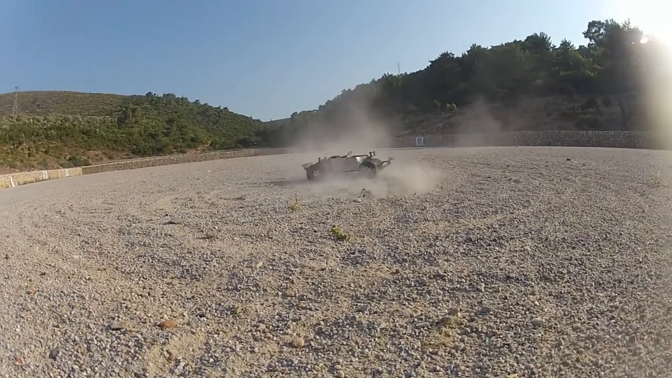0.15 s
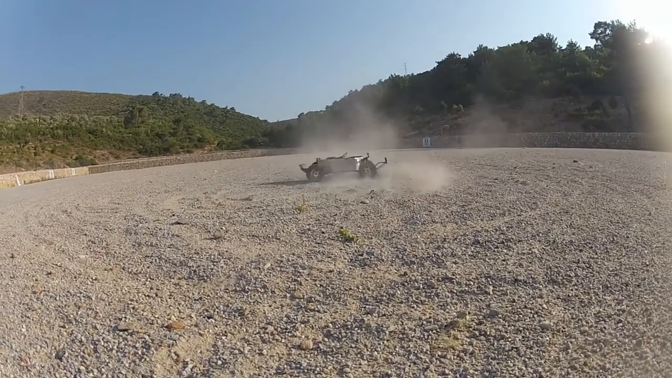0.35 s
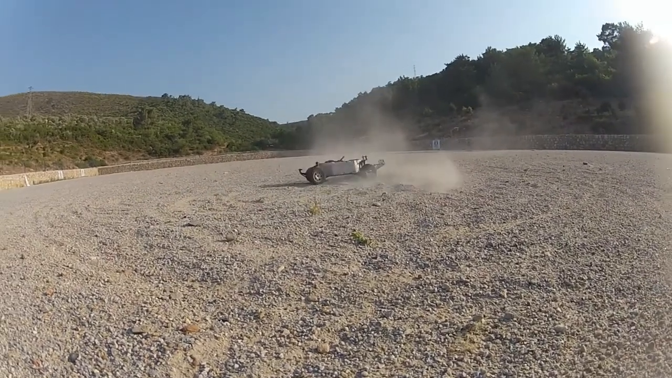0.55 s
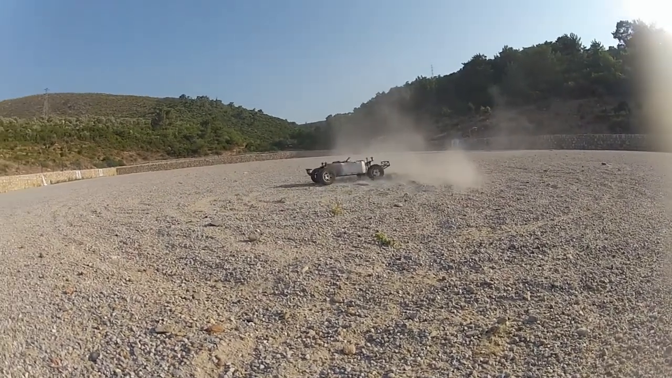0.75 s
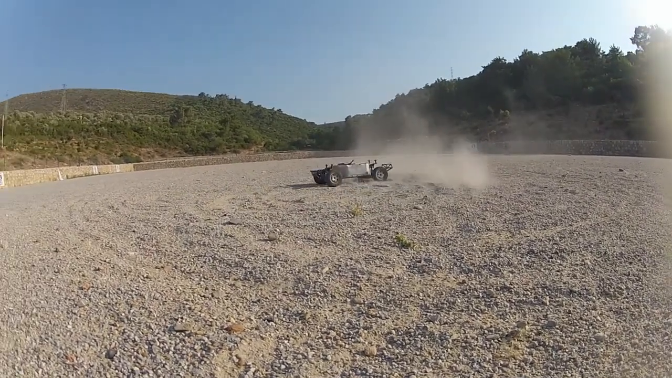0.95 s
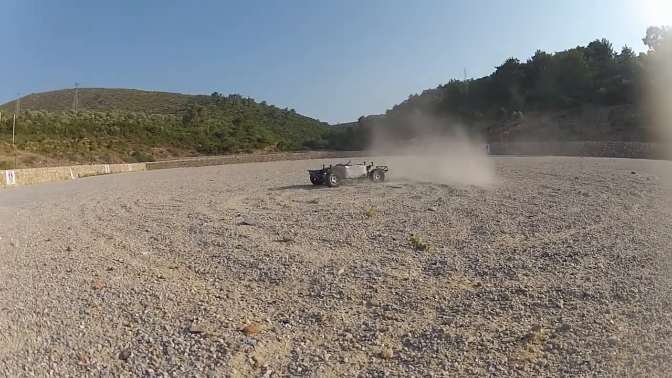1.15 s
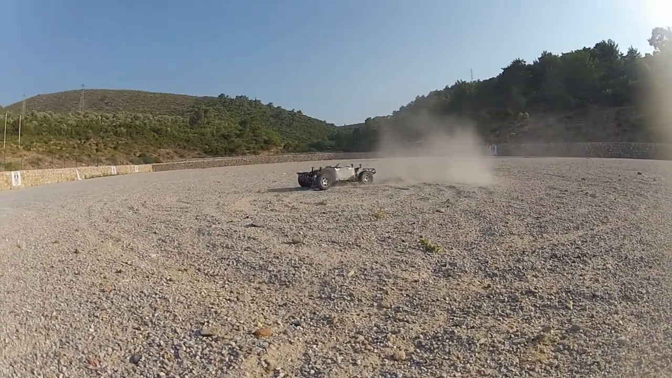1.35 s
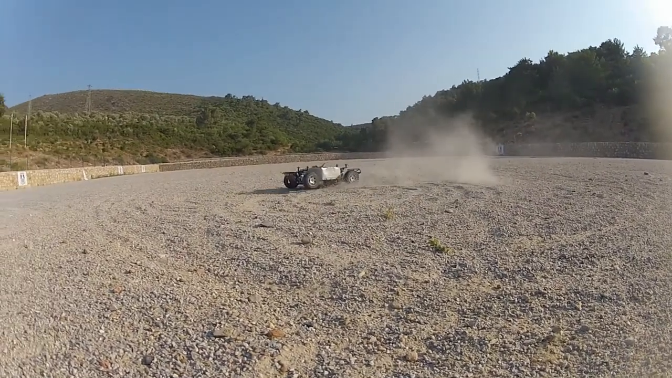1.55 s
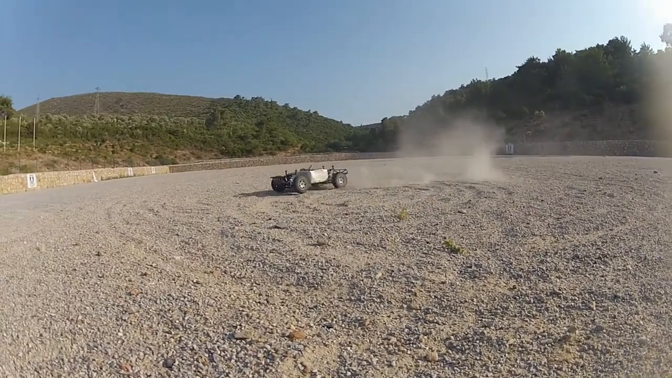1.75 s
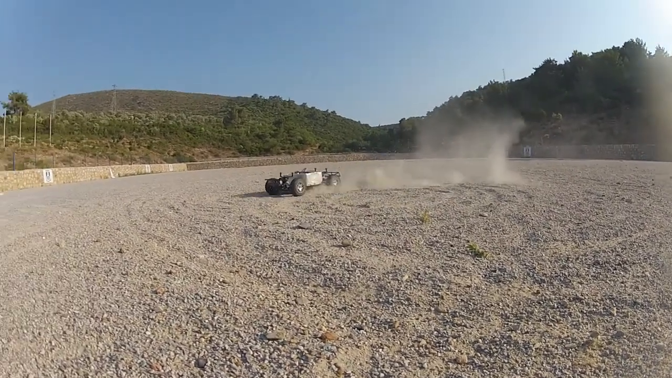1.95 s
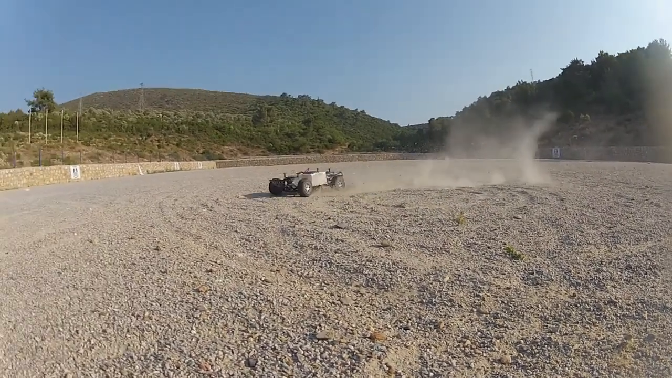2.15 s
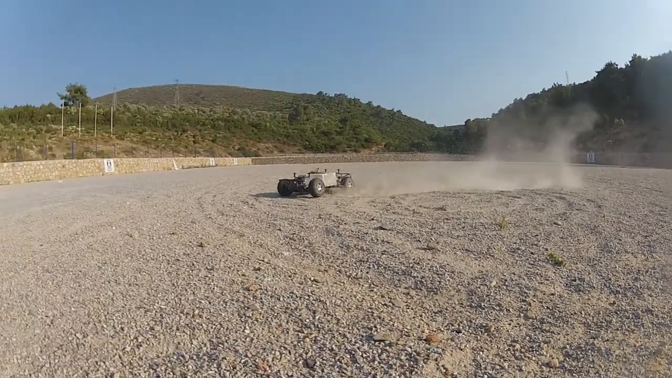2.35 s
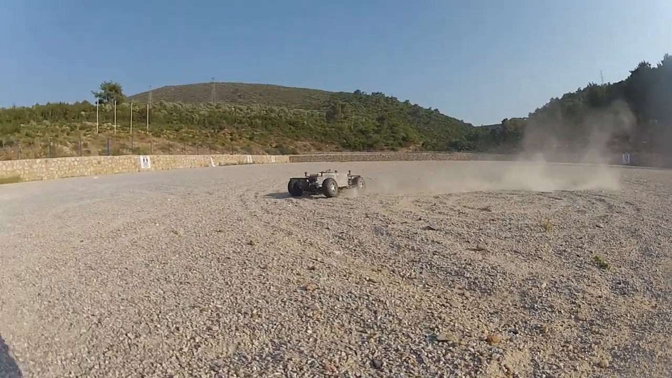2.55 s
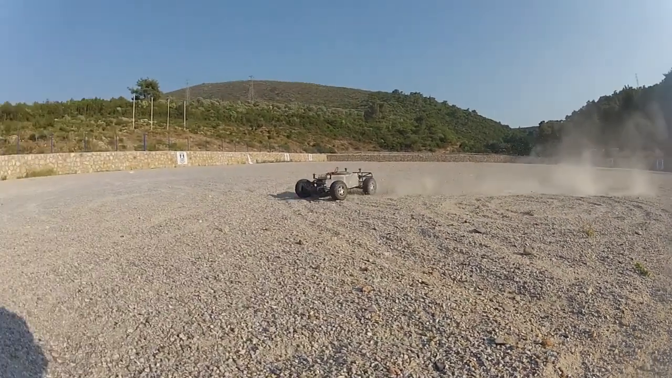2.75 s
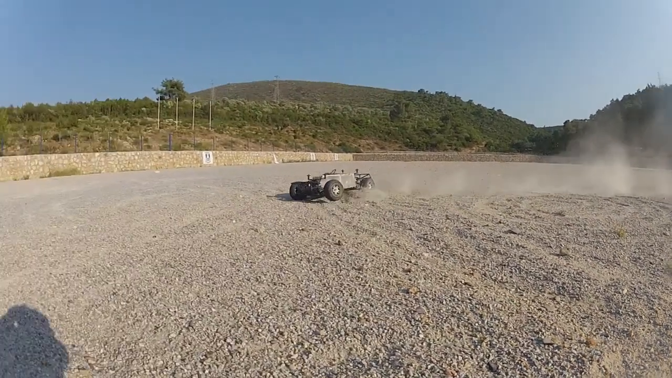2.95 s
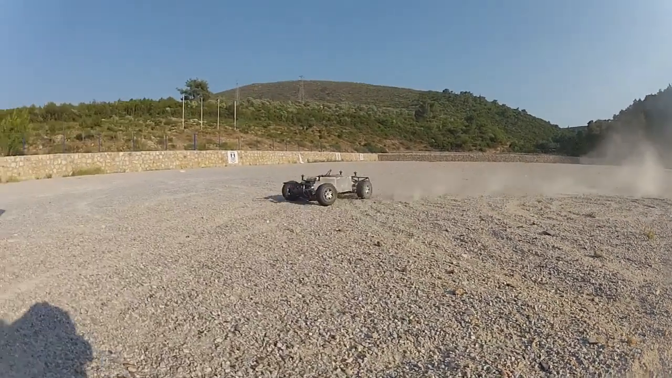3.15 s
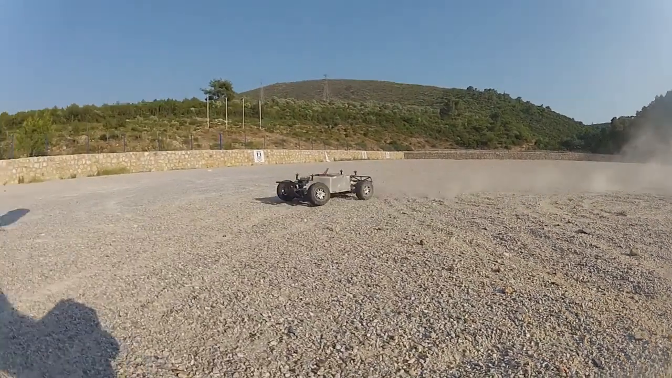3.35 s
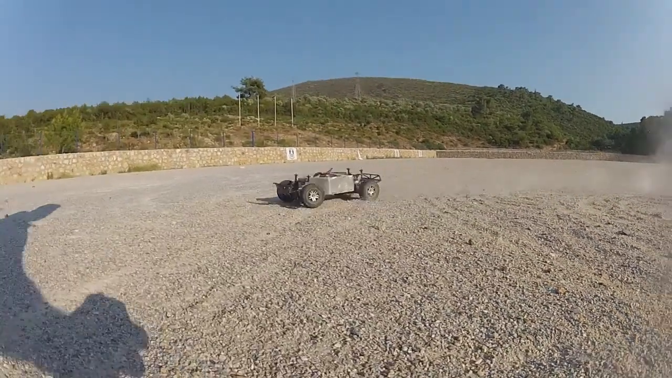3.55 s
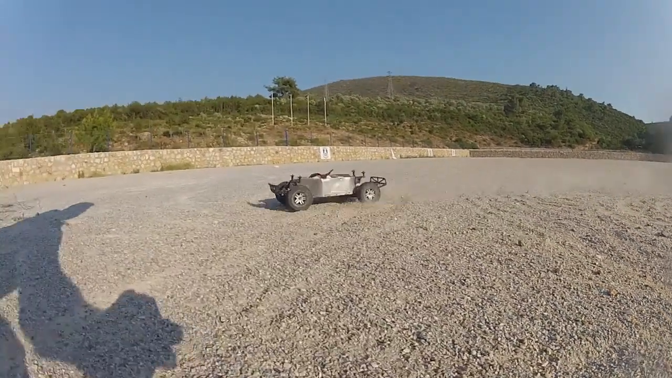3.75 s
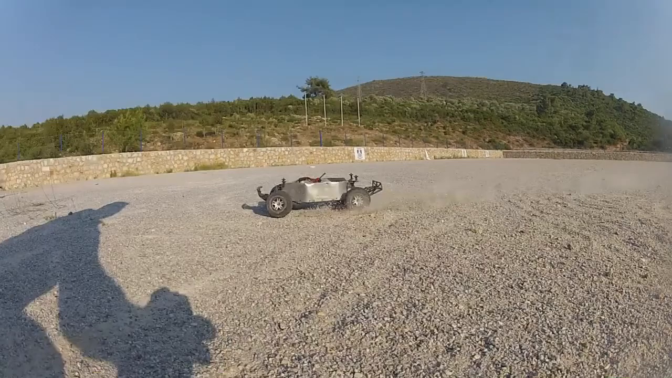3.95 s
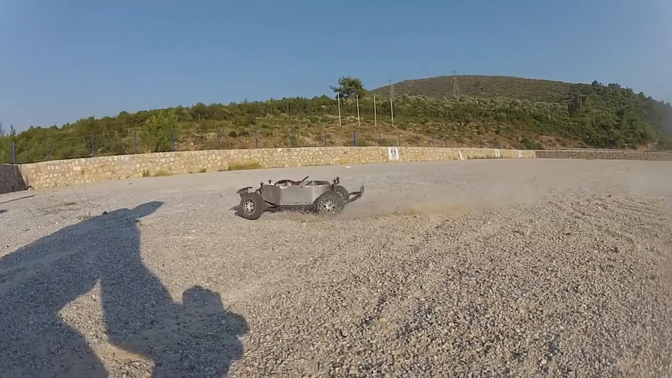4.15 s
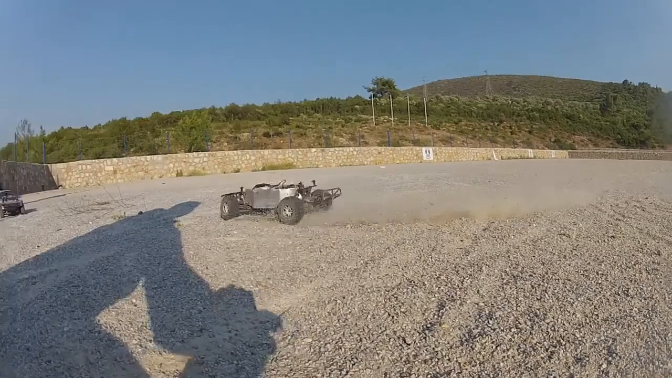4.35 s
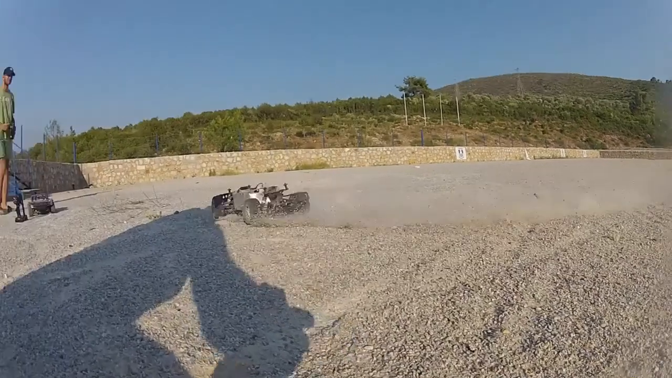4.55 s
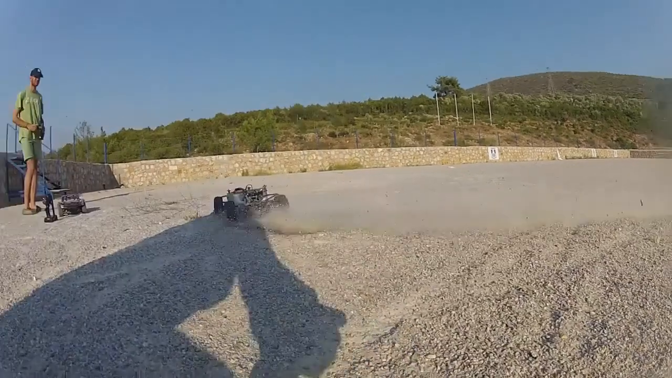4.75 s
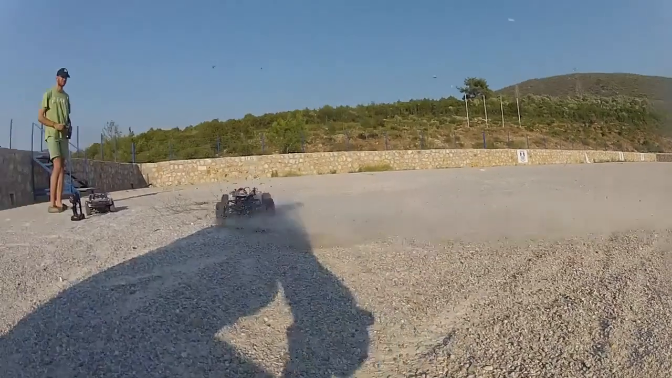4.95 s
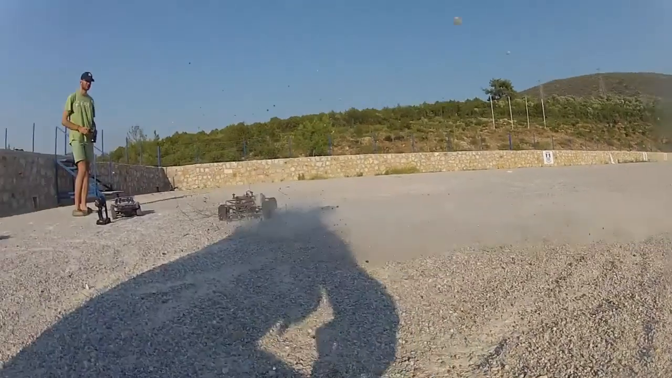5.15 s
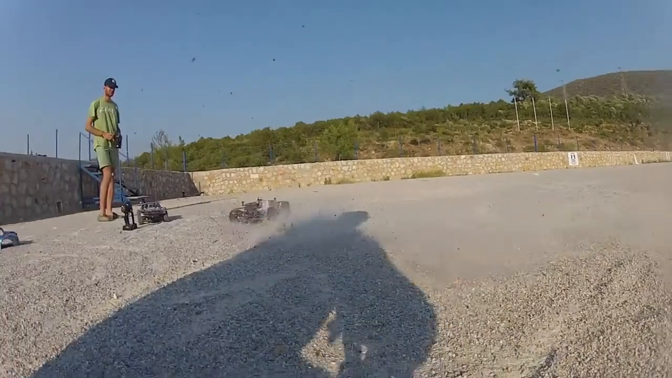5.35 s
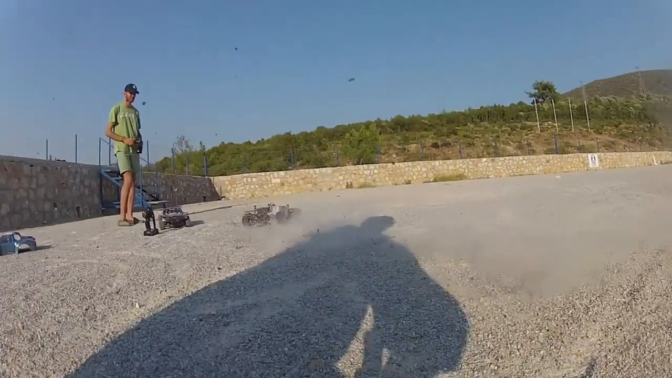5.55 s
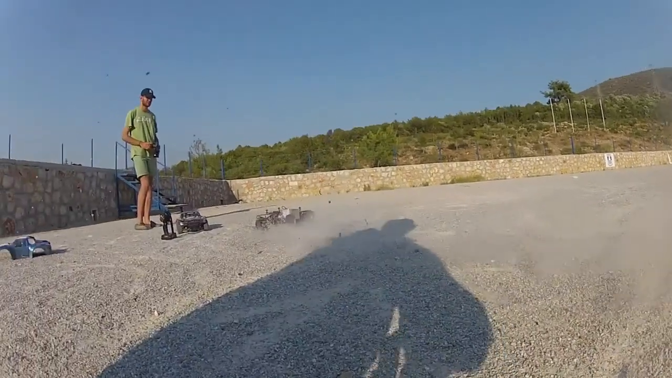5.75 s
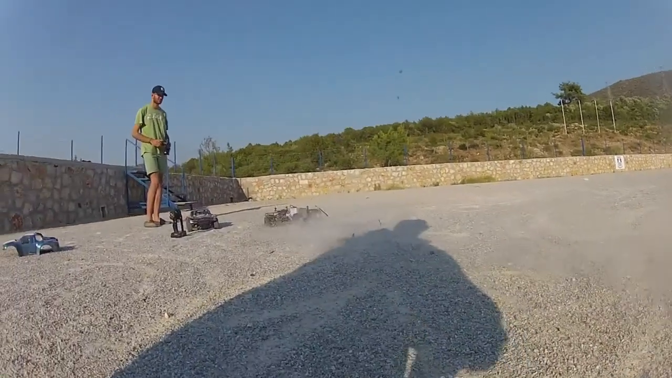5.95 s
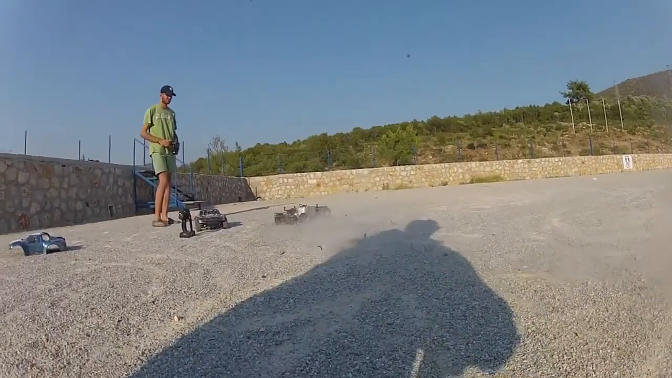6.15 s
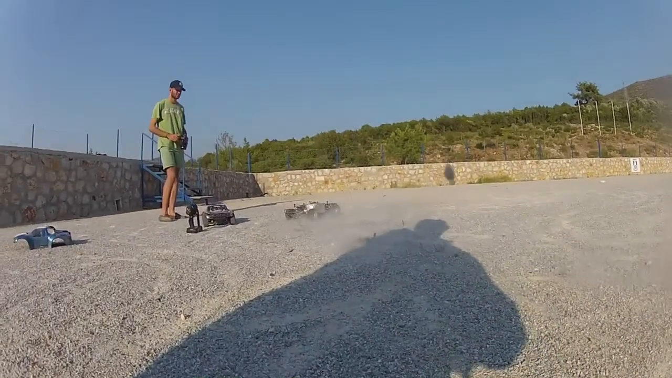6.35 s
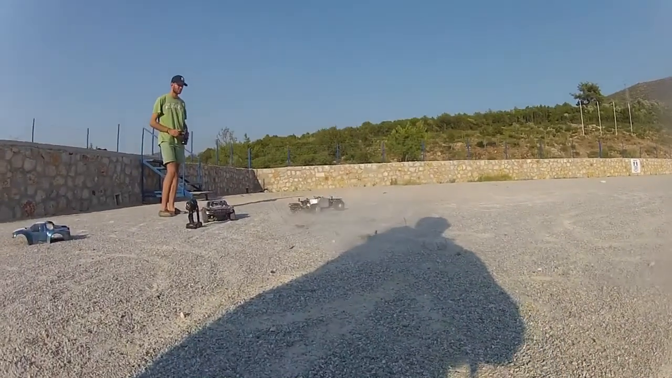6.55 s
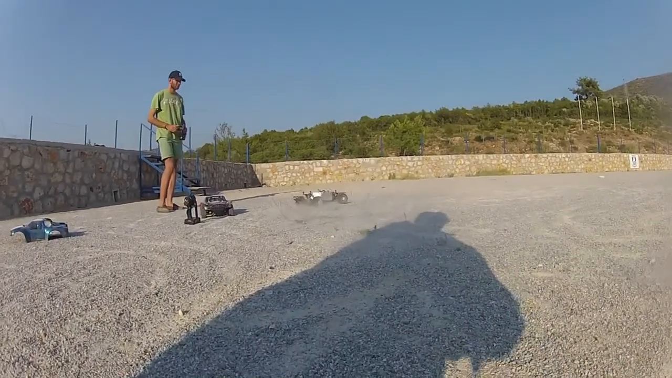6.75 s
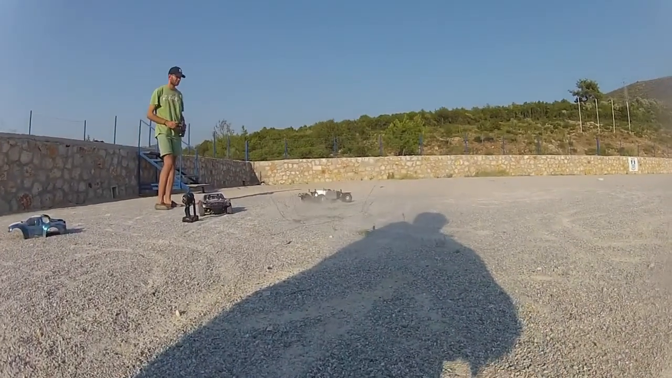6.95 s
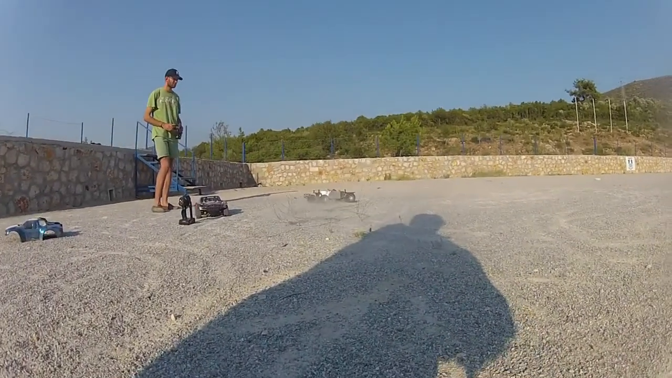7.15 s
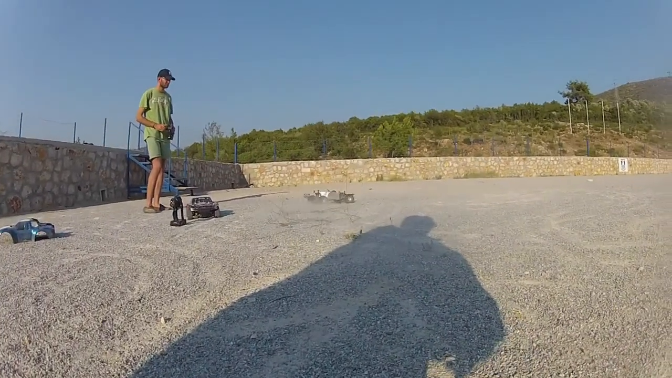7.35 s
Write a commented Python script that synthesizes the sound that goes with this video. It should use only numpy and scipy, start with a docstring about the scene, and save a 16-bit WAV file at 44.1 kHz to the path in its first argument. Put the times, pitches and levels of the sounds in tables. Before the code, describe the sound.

Slow-motion radio-controlled truck crunches over gravel, motor whining in stuttering glides, then a stone knocks the camera case hard, followed by small ticks.

```python
"""Gravel lot: a radio-controlled truck slides and revs; stones tick on a camera's sealed case, one knocks it hard.
Tyre hiss is shaped noise with grains, the motor is gliding tones, rough tones hold; all pass the case's modes.
Each stone is a blow and a skid of tiny contacts that set off the modes; wind rumbles and a gear rattles.
Coarse sampling adds mirror bands; slow-motion playback replays overlapping slices, so sounds stutter three times."""
import sys
import numpy as np
from scipy import signal
from scipy.fft import rfft, irfft
from scipy.io import wavfile
from scipy.ndimage import uniform_filter1d

SR = 44100
rng = np.random.default_rng(int(sys.argv[2]) if len(sys.argv) > 2 else 0)


def file_out(sig):
    """Save sig as 16-bit WAV at sys.argv[1]."""
    # one column per channel
    cols = np.atleast_2d(sig).T
    # limit, then scale
    lim = np.clip(cols, -1, 1)
    pcm = np.round(lim * 32767).astype(np.int16)
    wavfile.write(sys.argv[1], SR, pcm)


def ratio(d):
    """dB to gain"""
    e = np.asarray(d, float) / 20
    return 10 ** e


N = 324135
REAL_SAMPLES = N // 3 + SR // 8  # real time that the slow motion stretches

# slow motion: first seam, slice length, cross-fade
FIRST_SAMPLES, SLICE_SAMPLES, FADE_SAMPLES = 2300, 3150, 530
# seam offsets creep from 5 to -3 ms, each up to 7 ms off
SEAMS_MS = np.linspace(5, -3, N // SLICE_SAMPLES + 2) + rng.uniform(-7, 7, N // SLICE_SAMPLES + 2)
# seams while the stones fly, one a slice from STONE_SLICE on: (offset [ms])
STONE_SLICE = 67
STONE_SEAMS_MS = [-5.3, -6.2, -0.82, -5.35, -6.92, -2.09, -2.68, 1.51, -7.65, -7.74, 5.89, 2.35, -5.34,
                  4.05, -2.82, -3.59, -6.27, -7.5, -0.45, -8.32, -2.58, -2.63, 3.83, 4.62, -3.59]

# steady hiss, opposite in the channels: (frequency [Hz], relative density [dB per Hz])
SIDE_HISS_COLOUR = [(24, -29.5), (40, 1), (659, -8.5), (1080, -20), (2110, -15), (3830, -11), (5990, -19),
                    (6950, -14.5), (15000, -35.5)]
SIDE_HISS_DB = -78.5
# side signal that follows the mid: (frequency [Hz], side over mid before soft limiting [dB])
SIDE_OVER_MID = [(60, -26.5), (200, -23), (700, -31.5), (2380, -36.5), (4400, -29), (15000, -31)]

# wind on the case: (played time [s], level before trim [dB])
WIND_LEVEL = [(0, -57), (1.68, -57.5), (1.92, -54.5), (2.6, -57.5), (2.99, -56), (3.25, -60), (4.09, -52.5),
              (4.65, -56), (4.93, -55), (5.24, -58), (6.04, -56.5), (7.35, -59.5)]
# wind spectrum: (frequency [Hz], relative density [dB per Hz])
WIND_COLOUR = [(10, 0.5), (25, 12), (90, -2), (250, -5.5), (400, -7.5), (600, -18), (1200, -24.5),
               (6000, -42.5)]

# gear rattle: (played time [s], level [dB])
RATTLE_LEVEL = [(1.9, -95), (2.1, -69), (2.4, -65), (2.9, -72), (3.0, -95)]
RATTLE_HZ, RATTLE_HALF_WIDTH_HZ, RATTLE_KNOCKS_PER_S = 3850, 220, 75

# tyres and gears: (played time [s], level before trim [dB], brightness [dB per octave])
TRUCK_LEVEL = [(0, -61, -3), (1.04, -61.5, -2.5), (1.21, -53.5, -1.5), (1.56, -52, 0), (1.98, -52, -2),
               (2.11, -54.5, -0.5), (2.99, -59, -2), (3.15, -63, -1), (3.4, -57, -3), (3.77, -51, 0.5),
               (4.13, -48, -2), (4.46, -56, -1), (5.12, -65.5, 0), (5.65, -67, 1.5), (5.92, -62.5, -1.5),
               (6.88, -61, -1.5), (7.35, -66, -2.5)]

# rough held tones: (real time [s], length [s], frequency [Hz], level before trim [dB])
HELD_TONES = [(0.034, .04, 3520, -62.5), (0.555, 0.13, 930, -65.5), (0.791, .085, 925, -62),
              (0.813, 0.15, 1647, -62), (1.26, .26, 2440, -69), (1.43, .12, 3630, -63.5)]
# throttle blips, one curve each: (real time [s], shaft order [Hz], level before trim [dB])
REVS = [
    [(0.396, 570, -48), (.42, 750, -56.5), (.44, 990, -52), (.465, 1150, -51), (.49, 1370, -52.5),
     (.528, 1690, -51), (.55, 1710, -62)],
    [(1.18, 630, -61), (1.225, 770, -49), (1.27, 960, -57.5), (1.3, 1250, -56), (1.343, 1630, -56),
     (1.39, 1530, -61)],
]
# thin high whine, one curve a stroke: (real time [s], frequency [Hz], level before trim [dB])
WHINES = [
    [(0, 1680, -67), (.065, 1727, -68), (.105, 1418, -58.5), (.19, 1767, -72), (.214, 1654, -57.5),
     (.238, 1300, -64), (.3, 1662, -63), (.38, 1712, -62.5), (.41, 2510, -49)],
    [(.975, 2040, -62), (.99, 2072, -54), (1.043, 2180, -57.5), (1.08, 1620, -68.5), (1.13, 1680, -59),
     (1.164, 1933, -48.5), (1.2, 2500, -60)],
    [(2.18, 2020, -69), (2.2, 2020, -60.5), (2.22, 2230, -56.5), (2.25, 2184, -57), (2.285, 2367, -60.5),
     (2.34, 2396, -64.5), (2.36, 2230, -55)],
]
ROUGHNESS_RMS, WOBBLE_RMS = .3, .012  # fractions of level and of pitch
REV_FLUTTER_DB, WHINE_FLUTTER_DB, HELD_FLUTTER_DB = 4, 7, 8
WHINE_WANDER_RMS, HELD_WANDER_RMS = .02, .035  # fractions of pitch
# second order over the first at 1 kHz shaft order; 20 dB weaker above the top
OVERTONE_DB, OVERTONE_DB_PER_OCTAVE, OVERTONE_TOP_HZ = -7.5, 12, 3000

# case modes: (frequency [Hz], level [dB], t60 [s], extra when struck [dB])
CASE_MODES = [(626, -6, .014, -3.5), (937, -3.5, 0.021, 3.5), (1251, -7.5, 0.024, -8), (1615, -6, 0.018, 4),
              (2082, -4, 0.01, -0.5), (2450, -5, 0.022, -6.5), (2785, -2.5, 0.0073, 3),
              (3604, -3.5, 0.0078, -2), (3800, -4, 0.011, -4), (4464, -5.5, 0.0063, -1),
              (4955, -12.5, 0.016, 4), (5570, -9.5, 0.009, 3.5)]
# stones: (played time of first hearing [s], peak [dB], blow centre [Hz], spread [octaves],
# skid decay [ms], lens-window weight [dB])
STONES = [(5.0489, -22, 1415, 0.49, 3.04, -1.5), (5.1128, -23, 1165, 0.97, 1.7, -17),
          (5.189, -4, 4300, 0.29, 0.36, -9.5), (5.1918, -2, 2554, 0.65, 1.1, 7),
          (5.3289, -24, 2366, 0.79, 2.4, -13), (5.473, -27, 1910, 0.66, 2.9, 13),
          (5.555, -34.5, 1920, 1.3, 1.1, -26.5), (5.605, -40, 2230, 1.1, 2.2, -7),
          (5.968, -34, 2725, 0.46, 3.5, 2), (6.182, -21, 2340, 0.51, 0.49, 0.5),
          (6.189, -31.5, 3103, 0.71, 3.3, -13), (6.197, -38.5, 2540, 0.82, 2, 1.5),
          (6.408, -42.5, 2190, 0.24, 0.43, -27), (6.475, -52.5, 2460, 0.75, 1, -15)]
WINDOW_HZ = 3730
# contact crack: two sines, at the blow's centre and at the snap
CRACK_DB, SNAP_HZ, SNAP_DB, CRACK_T60_S = 0, 5120, -3, 0.0021
# inward pushes on the wall: (played time [s], level [dB], held [ms], swing back [ms])
PUSHES = [(4.838, -35, 0.45, 1.5), (5.189, 11, 2.3, 2.36), (6.476, -47.5, 7.8, 30)]
PRESS_MS, RELEASE_MS = 1.64, 2.08


def evened(x):
    """Scales to rms 1."""
    return x / np.sqrt(np.mean(x ** 2) + 1e-20)


def add(mix, at, sound):
    """Mixes a sound in at a sample."""
    part = mix[at:][:len(sound)]
    part += sound[:len(part)]


def spectrum_db(rows, bins_hz):
    """Reads a (Hz, dB) table along log frequency."""
    hz, db = np.transpose(rows)
    return np.interp(np.log(bins_hz + 1), np.log(hz + 1), db)


def playhead(shift=0):
    """Real-time sample read at every played sample: each seam jumps back; shift delays the jumps."""
    after = STONE_SLICE + len(STONE_SEAMS_MS)
    seams_ms = np.r_[0, SEAMS_MS[1:STONE_SLICE], STONE_SEAMS_MS, SEAMS_MS[after:]]
    # two thirds of a slice per seam
    jumped = np.arange(len(seams_ms)) * SLICE_SAMPLES * 2 // 3 + np.round(seams_ms * SR / 1000)
    slices = np.clip((np.arange(N) - FIRST_SAMPLES - shift) // SLICE_SAMPLES + 1, 0, None)
    return (np.arange(N) - jumped[slices]).astype(int)


def real_curve(rows, hop):
    """Reads curves at every hop of real time: played time is three times the real time less half a slice."""
    s, *columns = np.transpose(rows)
    played_s = 3 * (np.arange(REAL_SAMPLES // hop + 8) * hop - SLICE_SAMPLES / 2) / SR
    return [np.interp(played_s, s, column) for column in columns]


def noise(field_db, patchy_db):
    """Random short-time spectra shaped by a dB field over (frame, bin), with drifting patches."""
    real, imaginary, patches = rng.standard_normal(field_db.shape + (3,)).T
    patches = uniform_filter1d(patches, size=6, axis=0)
    patches = evened(uniform_filter1d(patches, size=6, axis=1))
    z = (real + 1j * imaginary) * ratio(field_db.T + patchy_db * patches)
    return signal.istft(z, nperseg=512, noverlap=384)[1][:REAL_SAMPLES] / np.sqrt(257)


def side_hiss():
    """Steady coloured noise, opposite in sign in the two channels."""
    colour_db = spectrum_db(SIDE_HISS_COLOUR, np.fft.rfftfreq(N, 1 / SR))
    hiss = irfft(rfft(rng.standard_normal(N)) * ratio(colour_db), N)
    return ratio(SIDE_HISS_DB) * evened(hiss)


def wind():
    """Lumpy low rumble over a faint hiss, as air buffets the case."""
    colour_db = spectrum_db(WIND_COLOUR, np.fft.rfftfreq(512, 1 / SR))
    level_db, = real_curve(WIND_LEVEL, hop=128)
    return ratio(22.0) * noise(level_db[:, None] + colour_db, patchy_db=-0.5)


def rattle():
    """A loose gear knocks unevenly and rings one narrow band."""
    unevenness = uniform_filter1d(rng.standard_normal(REAL_SAMPLES), size=300)
    turns = np.cumsum(RATTLE_KNOCKS_PER_S * (1 + unevenness)) / SR
    knocks = .12 + np.exp(-(turns % 1) / .25)
    bursts = knocks * rng.standard_normal(REAL_SAMPLES)
    edges_hz = [RATTLE_HZ - RATTLE_HALF_WIDTH_HZ, RATTLE_HZ + RATTLE_HALF_WIDTH_HZ]
    band = signal.butter(2, edges_hz, "band", fs=SR, output="sos")
    level_db = real_curve(RATTLE_LEVEL, hop=1)[0][:REAL_SAMPLES]
    return evened(signal.sosfilt(band, bursts)) * ratio(np.minimum(level_db, 0))


def truck():
    """Tyres on gravel: tilted noise made to crunch by grains of random strength, 64 samples each."""
    level_db, tilt_db = real_curve(TRUCK_LEVEL, hop=128)
    octaves = np.log2(np.maximum(np.fft.rfftfreq(512, 1 / SR), 300) / 1500)
    hiss = noise(level_db[:, None] + tilt_db[:, None] * np.minimum(octaves, 2), patchy_db=1.5)
    grains = ratio(1.9 * np.minimum(rng.exponential(1, REAL_SAMPLES // 64 + 1), 4))
    return ratio(0.5) * hiss * evened(np.repeat(grains, 64)[:REAL_SAMPLES])


def rough_tone(rows, flutter_db=REV_FLUTTER_DB, wander=0):
    """Start and samples of a tone that follows a pitch and level curve while both shake at random."""
    s, hz, db = np.transpose(rows)
    t = np.arange(s[0], s[-1], 1 / SR)
    fast, slow = rng.standard_normal((2, 2, len(t)))
    wobble, shake = (evened(uniform_filter1d(v, size=150)) for v in fast)
    drift, flutter = (evened(uniform_filter1d(uniform_filter1d(v, size=220), size=220)) for v in slow)
    pitch_hz = np.interp(t, s, hz) * (1 + WOBBLE_RMS * wobble + wander * drift)
    turns = np.cumsum(pitch_hz) / SR
    level = ratio(np.interp(t, s, db) + flutter_db * np.minimum(flutter, .5))  # dips more than it swells
    level = level * (1 + ROUGHNESS_RMS * shake) * signal.windows.tukey(len(t), .1)
    return round(max(s[0], 0) * SR), np.sqrt(2) * level * np.sin(2 * np.pi * turns)


def held_tones():
    """Rough tones that hold one centre pitch each, some near the case's resonances."""
    out = np.zeros(REAL_SAMPLES)
    for s, length_s, hz, db in HELD_TONES:
        held = [(s, hz, db), (s + length_s, hz, db)]
        add(out, *rough_tone(held, HELD_FLUTTER_DB, HELD_WANDER_RMS))
    return ratio(-10.0) * out


def motor():
    """Throttle blips glide with shaft speed and its second order; the high whine joins them."""
    out = np.zeros(REAL_SAMPLES)
    for rows in REVS:
        s, hz, db = np.transpose(rows)
        overtone_db = db + OVERTONE_DB + OVERTONE_DB_PER_OCTAVE * np.log2(hz / 1000)
        overtone_db = overtone_db - 20 * (2 * hz > OVERTONE_TOP_HZ)
        add(out, *rough_tone(np.c_[s, 2 * hz, overtone_db]))
        add(out, *rough_tone(rows))
    for rows in WHINES:
        add(out, *rough_tone(rows, WHINE_FLUTTER_DB, WHINE_WANDER_RMS))
    return ratio(-10.0) * out


def ring(weight=lambda hz: 1, struck=False):
    """The case's modes set off once as decaying sines; neighbours swing in opposite sense."""
    t = np.arange(2000) / SR
    out = np.zeros(len(t))
    for k, (hz, db, t60_s, struck_db) in enumerate(CASE_MODES):
        decay = ratio(db + struck * struck_db - 60 * t / t60_s)
        out += (-1) ** k * weight(hz) * decay * np.sin(2 * np.pi * hz * t)
    return out


def through_case(x):
    """Filters outside sound by the modes of the case wall."""
    wall = ring()
    return signal.oaconvolve(x, wall / np.linalg.norm(wall))[:len(x)]


def push(db, held_ms, back_ms):
    """The wall is pressed in; air leaks round it, so the pressure overshoots when it springs back."""
    t_ms = np.arange(4000) / SR * 1000
    press = -np.clip(t_ms / PRESS_MS, 0, 1) * np.clip((held_ms - t_ms) / RELEASE_MS + 1, 0, 1)
    leak = np.exp(-1000 / SR / back_ms)
    return ratio(db) * signal.lfilter([1, -1], [1, -leak], press)


def stone(db, centre_hz, spread_octaves, skid_ms, window_db, chance):
    """A blow and a skid of tiny contacts crack, driving modes near the blow's centre and the lens window."""
    t = np.arange(len(chance)) / SR
    contacts = .2 * chance * np.exp(-t * 1000 / max(skid_ms, .1))
    contacts[0] = 1  # the blow

    def near(hz, to_hz, octaves):
        return np.exp(-.5 * (np.log2(hz / to_hz) / octaves) ** 2)

    def weight(hz):
        return near(hz, centre_hz, spread_octaves) + ratio(window_db) * near(hz, WINDOW_HZ, 0.085)

    body = ring(weight, struck=True)
    for hz, crack_db in (centre_hz, CRACK_DB), (SNAP_HZ, SNAP_DB):
        add(body, 0, ratio(crack_db - 60 * t / CRACK_T60_S) * np.sin(2 * np.pi * hz * t))
    body *= 1 - np.exp(-np.arange(len(body)) / SR / .0004)  # the contact takes a moment to build
    sound = np.convolve(contacts, body)
    return ratio(db) * sound / abs(sound).max()


def scene():
    """The lot in real time, alike in both channels; the rest of the array is silent."""
    mix, heard = np.zeros(N), playhead(shift=FADE_SAMPLES // 2)
    mix[:REAL_SAMPLES] = wind() + rattle() + through_case(truck() + held_tones() + motor())
    for (s, *blow), chance in zip(STONES, rng.standard_normal((len(STONES), 800))):
        add(mix, heard[round(s * SR)], stone(*blow, chance))
    for s, *press in PUSHES:
        add(mix, heard[round(s * SR)], push(*press))
    return np.array([mix, mix])


def top_cut(x):
    """Nothing passes above the cut-off."""
    return signal.sosfilt(signal.butter(12, 16440, fs=SR, output="sos"), x)


def record(dry):
    """Overload, 12 kHz samples held as steps (mirror bands), slow-motion slices, a faint random-phase side."""
    coarse = np.clip(signal.resample_poly(dry[0, :REAL_SAMPLES], 40, 147), -1, 1)
    coarse = signal.lfilter(*signal.butter(1, 1.6, "high", fs=12000), coarse)
    steps = signal.resample_poly(np.repeat(coarse, 4), 147, 160)  # 48 kHz back to SR
    fade = np.clip((np.arange(N) - FIRST_SAMPLES) % SLICE_SAMPLES / FADE_SAMPLES, 0, 1)
    mid = fade * steps[playhead()] + (1 - fade) * steps[playhead(shift=FADE_SAMPLES)]
    side_db = spectrum_db(SIDE_OVER_MID, np.fft.rfftfreq(256, 1 / SR))
    smear = irfft(ratio(side_db) * np.exp(2j * np.pi * rng.random(129)))  # random phase
    limited = 0.26 * np.tanh(mid / 0.24)
    side = signal.oaconvolve(limited, smear)[:N] + side_hiss()  # follows the mid, over a steady hiss
    return top_cut(np.clip([mid + side, mid - side], -1, 1))


dry = scene()
out = record(dry)
file_out(out)
```